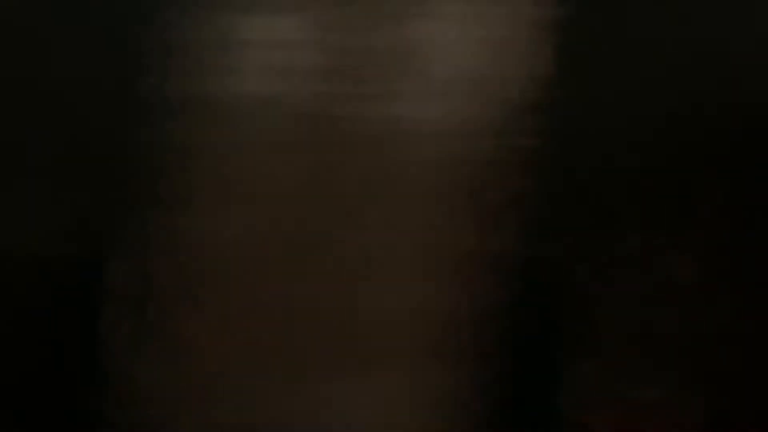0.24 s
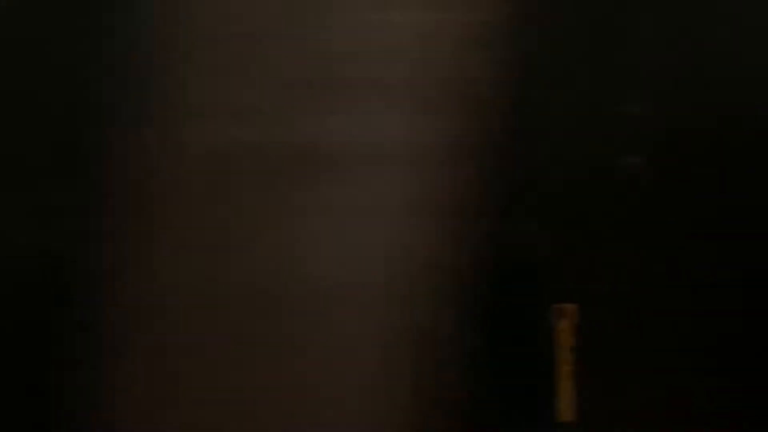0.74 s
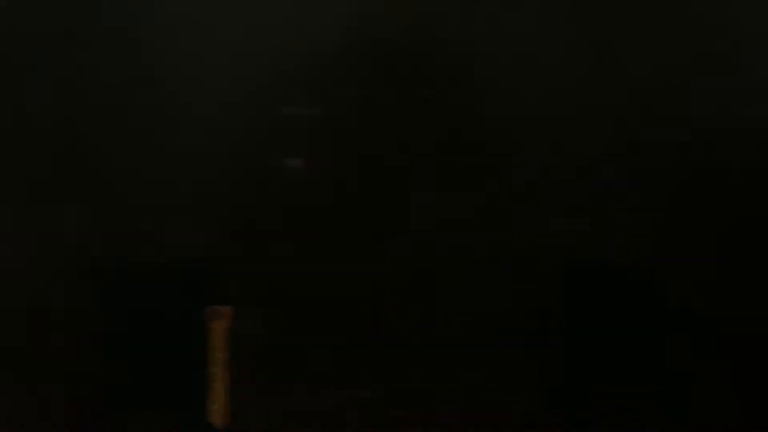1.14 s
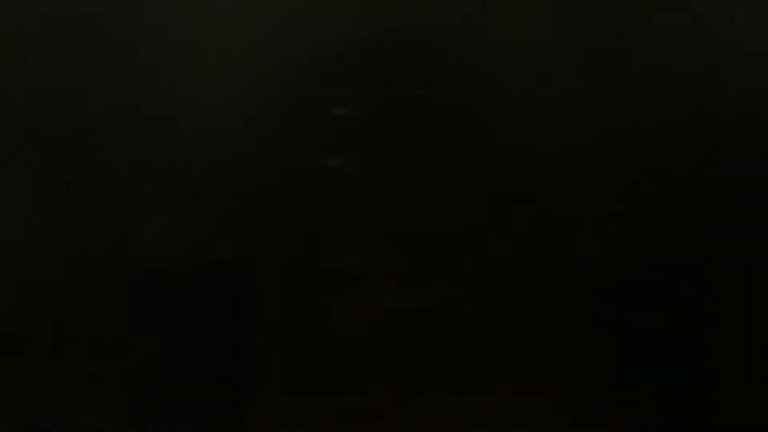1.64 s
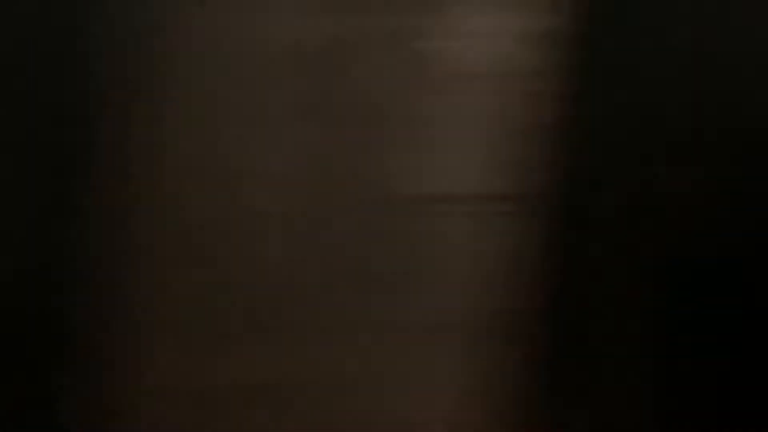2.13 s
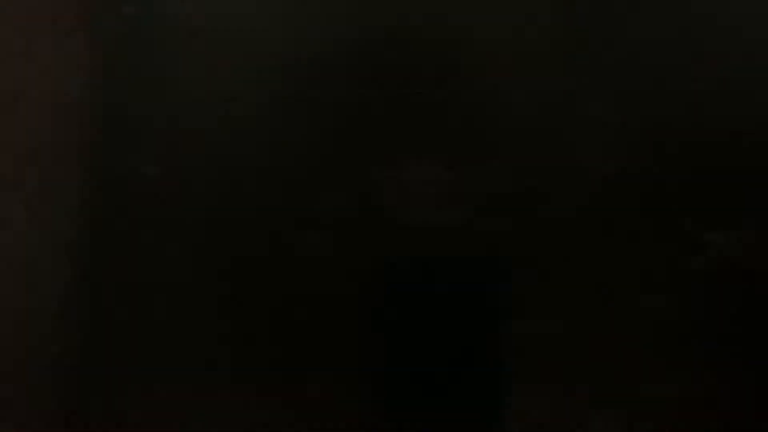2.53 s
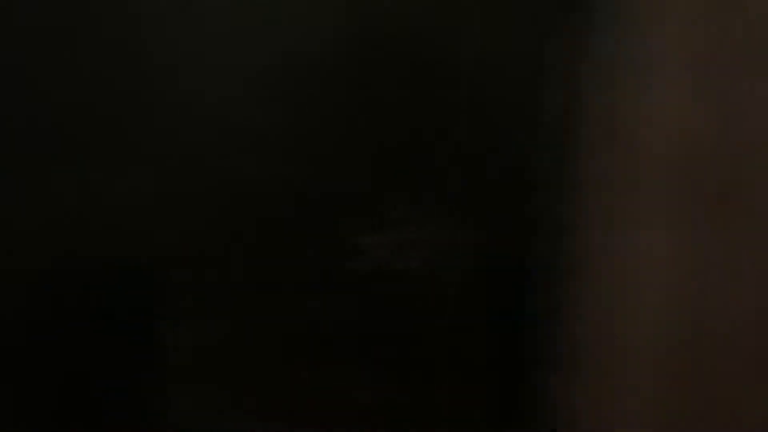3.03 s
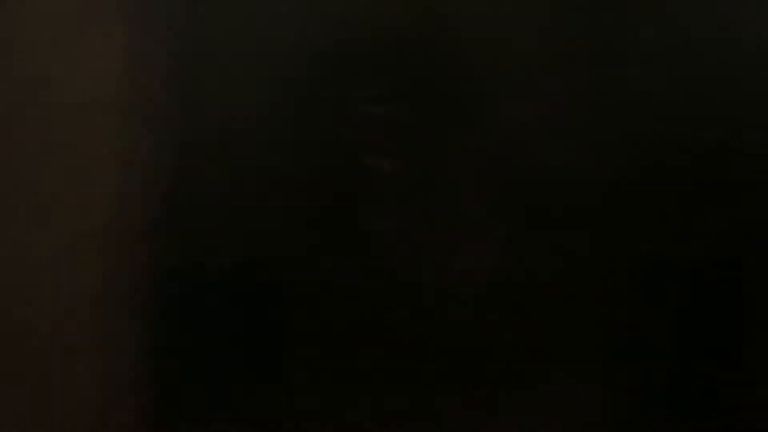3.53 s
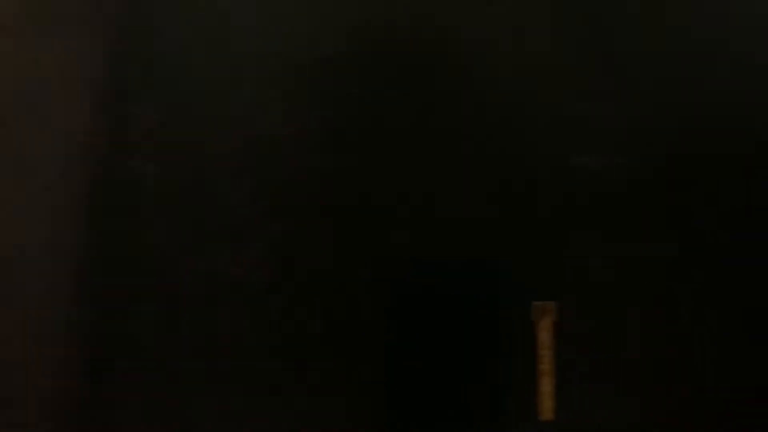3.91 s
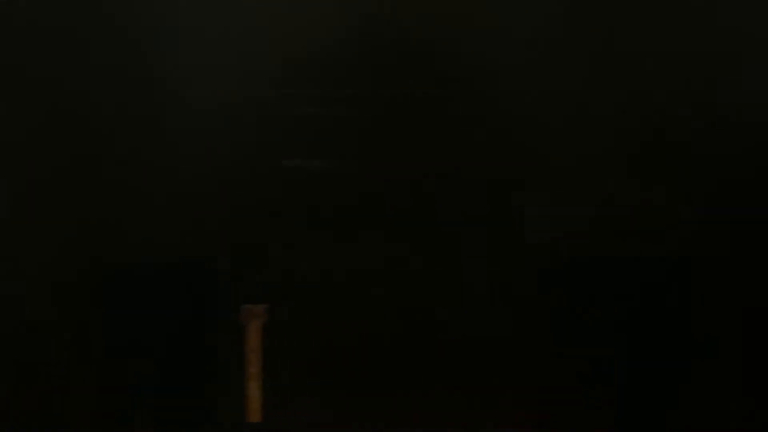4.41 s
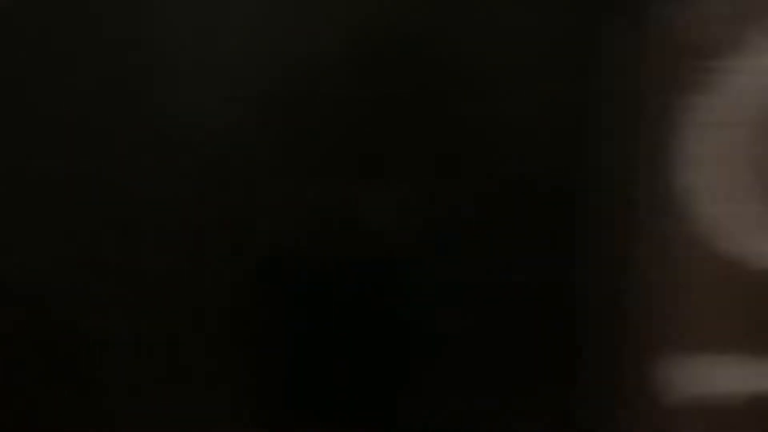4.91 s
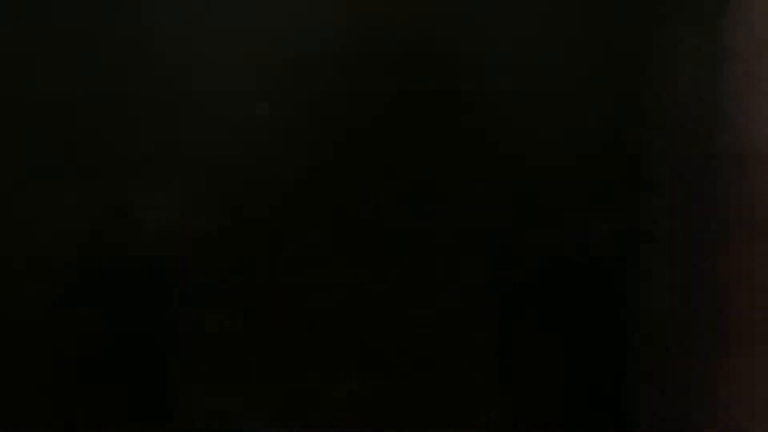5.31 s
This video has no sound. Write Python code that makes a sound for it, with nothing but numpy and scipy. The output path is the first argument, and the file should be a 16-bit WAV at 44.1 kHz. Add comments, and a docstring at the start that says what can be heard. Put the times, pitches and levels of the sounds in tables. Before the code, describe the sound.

Heard from inside a moving subway car in a dark tunnel: continuous dense rumble and panel roar, gently swelling. Over it, wheels sing with a rough, wavering high whine smeared by tunnel echo, strongest early to middle and again just before five seconds. A low hum rises and sinks. The whine dies away, leaving thin squeals and one tiny tick. Wide stereo, microphone in the cabin.

```python
"""Inside a subway car running at steady speed through a tunnel.
Rolling: shaped noise through body and steel resonances, with swelling lows and flickering treble.
Rail ripples make three wheels sing: wavering harmonics smeared by tunnel echoes. A low hum swells; the drive
holds steady tones. A flange rubs now and then as wavering wheel modes, and squeals thinly near the end,
where one small tick, a decaying noise burst, falls."""
import sys
import numpy as np
from scipy import signal
from scipy.fft import rfft, irfft
from scipy.io import wavfile
from scipy.ndimage import uniform_filter1d, map_coordinates

SR = 44100
rng = np.random.default_rng(int(sys.argv[2]) if len(sys.argv) > 2 else 0)


def dump(signal):
    """Clip the signal to [-1, 1] and save it as 16-bit WAV at the path in sys.argv[1]."""
    limited = np.clip(np.atleast_2d(signal).T, -1, 1)
    pcm = np.round(limited * 32767).astype(np.int16)
    wavfile.write(sys.argv[1], SR, pcm)


N = 244868
TIME_S = np.arange(N) / SR
FREQ_HZ = np.arange(N // 2 + 1) * SR / N

# rolling noise shape before resonances: [f/Hz, relative level/dB]
ROLLING_SHAPE = [(20, -22), (35, -9.5), (60, -6.5), (110, 0.5), (250, -4.5), (500, -11), (750, -12),
                 (1300, -19), (2000, -21.5), (2800, -17), (4000, -30), (6500, -46), (9000, -62.5),
                 (14000, -70)]
# car body and cabin resonances: [f/Hz, width/Hz, lift/dB]
BODY_MODES = [(58, 20, 9), (78.6, 13, -2.5), (92.7, 14, 7.5), (145, 15, 4), (208.4, 12, 5), (226, 28, 7.5),
              (252.3, 15.6, 9.5), (288, 41, 1.5), (336.5, 15, 5.5), (407.6, 5.1, 4), (440, 29, 4.5),
              (479.3, 30, 8), (572.7, 24, 6), (658, 18, 3)]
# wheel and rail resonances: [f/Hz, width/Hz, lift/dB]
STEEL_MODES = [(916.4, 28, 6.5), (1190, 220, 3.5), (1460, 28, 7.5), (1800, 414, 6.5), (2213, 17, 7.5),
               (3050, 160, 1.5), (3560, 200, 1), (4650, 200, 1), (5610, 420, 4)]
# base levels of the low noise bands: [deep thudding, floor rumble, cabin boom, panel roar], level/dB before trim
LOW_LEVELS = (-34, -26, -28, -24.5)
# chance swells and dips of the low noise bands:
# [start t/s, length/s, lift/dB of thudding, of rumble, of boom, of roar]
LOW_SWELLS = [(-.1, 0.33, 3, 2, 3, 0.5), (0.257, 0.61, 3.5, 0.9, 2.5, 0.5), (0.878, 0.64, 4, 1.4, 2, 0),
              (1.62, 0.35, 1, -1, 0.5, -0.5), (2.08, 0.35, 6, 1, 0.5, -0.5), (3.185, 0.25, -7, 0.5, 1, 0.7),
              (4.5, 0.2, -0.5, 4, -1, -0.5), (5.176, .22, 2, 4, -1.5, -0.5),
              (5.404, 0.12, -4, 0.5, -2, 2.3)]
# hiss of fine roughness, only its deviation from the mean counts: [t/s, level/dB]
HISS_COURSE = [(0.0, -48), (0.11, -48.5), (0.4, -47.5), (0.86, -49.5), (1.1, -48), (1.82, -51), (1.98, -48),
               (2.92, -50), (3.04, -48), (4.0, -49), (4.48, -50), (4.51, -49), (5.46, -49.5), (5.55, -49.5)]
# ripple under the wheels: [t/s, ripple rate f/Hz, singing level/dB, rate unevenness/Hz]
RIPPLE_COURSE = [(0, 927, -33.5, 10), (.1, 925, -31, 12), (.36, 909, -32.5, 20), (.5, 862, -36.5, 23),
                 (.66, 848, -39, 16), (.74, 950, -38, 16), (.92, 954, -32, 11), (1.11, 955, -30, 17),
                 (1.25, 934, -31.5, 26), (1.42, 952, -28, 22), (1.6, 938, -31, 22), (2.03, 947, -28.5, 22),
                 (2.2, 940, -30.5, 23), (2.35, 950, -30, 21), (2.55, 941, -29.5, 23), (2.72, 921, -30, 18),
                 (2.98, 908, -41, 20), (3.3, 902, -35.5, 9), (3.55, 877, -36, 9), (3.77, 884, -31.5, 5),
                 (3.87, 880, -38, 8), (4.0, 922, -31.5, 13), (4.23, 934, -31.5, 15), (4.45, 920, -45, 20),
                 (4.6, 932, -37, 13), (4.7, 934, -30.5, 9), (4.83, 934, -26.5, 7), (4.96, 935, -28, 7),
                 (5.12, 932, -35.5, 11), (5.24, 865, -45, 16), (5.55, 866, -52, 14)]
# wheel radiation of the ripple's harmonics: [f/Hz, relative level/dB]
WHEEL_RADIATION = [(900, -19), (1850, -18), (2400, -6), (2550, -2), (2680, -0.5), (2800, 0), (2920, 0),
                   (3010, -6), (3450, -15), (3540, -9), (3590, -11.5), (3645, -11), (3740, -19),
                   (3850, -28), (4420, -18), (4680, -34), (5320, -23), (5600, -29), (6500, -39),
                   (8400, -39), (10300, -51)]
# running gear hum: [t/s, f/Hz, level/dB before flutter]
HUM_COURSE = [(0, 231, -36.5), (.3, 230, -27.5), (.7, 229, -42), (1.25, 231, -26), (1.6, 230, -38.5),
              (2.1, 229.5, -26.5), (2.55, 229, -41), (3.2, 229, -33.5), (3.7, 227.5, -30.5), (4, 227, -33),
              (4.25, 228, -24.5), (4.55, 228, -30.5), (4.9, 229, -43), (5.55, 229, -41)]
# traction drive tones: [f/Hz, level/dB, waver/Hz]
DRIVE_TONES = [(114, -37.5, 1), (354, -41, .5), (400, -39.5, 1.5), (1460, -51, 14), (2159, -47.5, 2),
               (2228, -46, 2.5), (4042, -64, 3)]
# wheel modes rung by the flange: [start t/s, length/s, f/Hz, waver/Hz, level/dB before contact envelope]
FLANGE_MODES = [(-.1, .9, 2500, 50, -40), (-.1, .6, 3650, 50, -49), (2.48, .25, 3645, 25, -48),
                (2.55, 3.1, 2530, 13, -42.5), (2.6, 3.05, 2590, 26, -42), (5.1, .2, 13270, 60, -58),
                (5.34, .3, 13260, 60, -58), (5.34, .3, 3115, 35, -42), (5.36, .3, 3535, 32, -42.5),
                (5.28, .3, 7450, 70, -74), (5.12, .5, 9600, 220, -76)]
# likeness of left and right, clipped to +-0.99 in use: [f/Hz, correlation]
SIDE_LIKENESS = [(60, 0.99), (130, 0.95), (250, 0.8), (400, 0.37), (550, 0.24), (1050, -0.21),
                 (1900, -0.29), (2500, 0.24), (3200, -0.41), (4300, 0.37), (5800, -0.33), (7300, 0.81),
                 (9000, -1.46), (11000, -0.024), (13300, -0.97)]
# side balance: [f/Hz, left minus right level/dB]
SIDE_BALANCE = [(60, -2), (140, -1), (250, 0), (480, 1.5), (700, -1.5), (1500, 0.5), (2700, 2.5), (3400, 2),
                (4300, -0.8), (6300, -3), (9000, 0.5)]


def rolling(body_trim_db=0.52, steel_trim_db=0.14, grind_spread_db=-0.09, hiss_from_hz=3700):
    """Rail roughness drives body and steel resonances; the low bands swell and dip by chance."""
    lift_db = sum(db / (1 + (2 * (FREQ_HZ - hz) / width_hz) ** 2)
                  for hz, width_hz, db in [*BODY_MODES, *STEEL_MODES])
    subsonic_cut = FREQ_HZ ** 2 / (FREQ_HZ ** 2 + 12 ** 2)
    spectra = noise() * undb(along(ROLLING_SHAPE, FREQ_HZ) + lift_db) * subsonic_cut
    roll = level(cabin(spectra), -18)
    edges = [below(roll, hz) for hz in (82, 180, 290, 750, hiss_from_hz)]
    thud, rumble, boom, roar, grind, hiss = np.diff([0 * roll, *edges, roll], axis=0)
    body = sum(swell(band, db) for band, db in zip((thud, rumble, boom, roar), low_levels()))
    # patches of fine roughness move the treble apart from the rumble
    hiss_db, = curve(HISS_COURSE)
    grind = grind * undb(grind_spread_db * walk(9.7))
    hiss = hiss * undb(hiss_db - hiss_db.mean() + 0.36 * walk(15))
    return undb(body_trim_db) * drift(body) + undb(steel_trim_db) * flicker(grind + hiss)


def low_levels(sway_db=0.77, sway_rate_hz=6, edge_s=0.033):
    """Level curves of thudding, rumble, boom, roar: base level, slight sway, chance swells and dips."""
    lifts_db = sum(np.outer(lifts, presence(start_s, length_s, edge_s))
                   for start_s, length_s, *lifts in LOW_SWELLS)
    return [db + lift_db + sway_db * walk(sway_rate_hz) for db, lift_db in zip(LOW_LEVELS, lifts_db)]


def presence(start_s, length_s, edge_s):
    """How far a swell or dip is present, 0-1: ease on, hold, ease off."""
    ease_on = 1 + np.tanh(2 * (TIME_S - start_s) / edge_s)
    ease_off = 1 + np.tanh(2 * (start_s + length_s - TIME_S) / edge_s)
    return ease_on * ease_off / 4


def drift(x, rate_spread=0.01195, drift_rate_hz=4):
    """Body flexing makes its resonances wander in pitch: x is read at a slightly varying rate."""
    place = np.arange(N) + np.cumsum(rate_spread * walk(drift_rate_hz))
    return np.array([map_coordinates(side, [place], order=1, mode="mirror") for side in x])


def flicker(x, spread_db=1.57, rate_hz=18, band_hz=260):
    """Patchy fine roughness: narrow bands of the steel's noise each swell and fade on their own."""
    hz, s, bands = signal.stft(x, SR, nperseg=1024)
    patches = rng.standard_normal((128, 512))
    grid = np.meshgrid(hz / band_hz, s * rate_hz, indexing="ij")
    chance = map_coordinates(patches, grid, order=2, mode="wrap")
    gain = level(undb(spread_db * chance), 0)
    return signal.istft(bands * gain, SR)[1][:, :N]


def singing(wander_rate_hz=42, fade_rate_hz=24, fade_db=3, wheels=3):
    """Each wheel buzzes at its ripple rate; the third harmonic meets the wheel's main resonance."""
    ripple_hz, db, uneven_hz = curve(RIPPLE_COURSE)
    harmonics = np.arange(11) + 1
    # uneven ripples weaken the upper harmonics
    blur_db = .25 * np.outer(harmonics > 4, uneven_hz - uneven_hz.min())
    pair = 0
    for wheel in range(wheels):
        rate_hz = ripple_hz + uneven_hz * walk(wander_rate_hz)
        turn = np.exp(2j * np.pi * np.cumsum(rate_hz) / SR)
        # harmonics swell and fade as they wander across the resonances
        weights = undb(along(WHEEL_RADIATION, np.outer(harmonics, rate_hz)) - blur_db)
        partial, buzz = 1, 0
        for weight in weights:
            partial = partial * turn
            buzz = buzz + weight * partial.real
        # shifting contact load fades each wheel in and out
        pair = pair + tunnel(buzz * undb(fade_db * walk(fade_rate_hz)))
    return swell(cabin(rfft(pair)), db)


def tunnel(x, t60_s=0.27):
    """Dense echoes between car and tunnel wall smear a tone, differently for each side."""
    age_s = TIME_S[:SR // 4]
    echoes = rng.standard_normal((2, len(age_s))) * np.exp(-np.log(1000) * age_s / t60_s)
    return signal.fftconvolve(x[None], echoes, axes=1)[:, :N]


def hum(waver_hz=2.2, flutter_db=2.5):
    """The running gear hums: a wavering sine, swelling and sinking, its phase wandering between channels."""
    hz, db = curve(HUM_COURSE)
    phase = 2 * np.pi * np.cumsum(hz + waver_hz * walk(10)) / SR
    gain = undb(db + flutter_db * walk(5.1))
    return gain * np.array([np.sin(phase), np.cos(phase + walk(3))]) * np.sqrt(2)


def drive(fade_rate_hz=14, reflected_gain=1.0):
    """The traction drive whines steadily; reflections off the passing walls make each tone flicker."""
    out = 0
    for hz, db, waver_hz in DRIVE_TONES:
        turn = np.exp(2j * np.pi * np.cumsum(hz + waver_hz * walk(5)) / SR)
        direct = np.exp(2j * np.pi * rng.random((2, 1)))
        reflected = np.array([walk(fade_rate_hz) + 1j * walk(fade_rate_hz) for side in range(2)])
        tone = turn * (direct + reflected_gain * reflected)
        out = out + level(tone.real, db)
    return out


def flange(edge_s=0.06, slip_rate_hz=80):
    """A rubbing flange keeps single wheel modes ringing; quick slips make them waver and chatter."""
    out = 0
    for start_s, length_s, hz, waver_hz, db in FLANGE_MODES:
        ring = np.array([np.sin(2 * np.pi * np.cumsum(hz + waver_hz * walk(slip_rate_hz)) / SR)
                         for side in range(2)])
        chatter = undb(2 * walk(33))
        to_edge_s = np.minimum(TIME_S - start_s, start_s + length_s - TIME_S)
        contact = np.clip(to_edge_s / edge_s, 0, 1)
        out = out + level(ring * chatter, db) * contact
    return out


def tick(start_s=5.246, decay_s=.004, hz=10500, width_hz=3000):
    """One tiny bright tick: band noise, sudden onset, exponential decay."""
    age_s = np.maximum(TIME_S - start_s, 0)
    # -48 dB before the decay
    crack = level(irfft(noise() / (1 + ((FREQ_HZ - hz) / width_hz) ** 4), N), -48)
    return crack * (age_s > 0) * np.exp(-age_s / decay_s)


def cabin(pair):
    """Two unrelated spectra become left and right, with likeness and balance set by frequency."""
    alike = np.clip(along(SIDE_LIKENESS, FREQ_HZ), -.99, .99)
    mid = pair[0] * np.sqrt(1 + alike)
    side = pair[1] * np.sqrt(1 - alike)
    lean = undb(along(SIDE_BALANCE, FREQ_HZ) / 2)
    return irfft(np.array([(mid + side) * lean, (mid - side) / lean]) / np.sqrt(2), N)


def swell(x, db):
    """Impose the slow swells of a level curve; quick flutter stays."""
    span = int(.14 * SR)
    power = uniform_filter1d(np.mean(x ** 2, axis=0), span)
    return x * undb(db) / np.sqrt(uniform_filter1d(power, span // 2))


def below(x, hz):
    """Steep low-pass without phase shift."""
    return irfft(rfft(x) / (1 + (FREQ_HZ / hz) ** 16), N)


def noise():
    """Spectra of two unrelated white noises."""
    return rfft(rng.standard_normal((2, N)))


def walk(rate_hz):
    """Smooth chance changing about rate_hz times a second; rms 1."""
    knots = rng.standard_normal(4096)
    coarse_s = TIME_S[::32]
    smooth = map_coordinates(knots, [coarse_s * rate_hz], order=2, mode="wrap")
    return level(np.interp(TIME_S, coarse_s, smooth), 0)


def curve(rows):
    """Join (t/s, value, ..) rows by straight lines; one control per column."""
    at_s, *columns = np.transpose(rows)
    return [np.interp(TIME_S, at_s, column) for column in columns]


def along(points, hz):
    """Read (f/Hz, value) points on a log-frequency axis."""
    at_hz, value = np.transpose(points)
    return np.interp(np.log(np.maximum(hz, 1)), np.log(at_hz), value)


def level(x, db):
    """Scale a signal to an rms level."""
    return x * undb(db) / np.sqrt(np.mean(x ** 2))


def undb(db):
    """Decibels to gain."""
    return 10 ** (np.asarray(db) / 20)


def scene():
    """All sources, heard in the cabin."""
    return rolling() + singing() + cabin(rfft(hum() + drive() + flange() + tick()))


def record(dry):
    """Steep elliptic low-pass at 14.5 kHz."""
    return signal.sosfilt(signal.ellip(8, .2, 70, 14500, fs=SR, output="sos"), dry)


dry = scene()
out = record(dry)
dump(out)
```